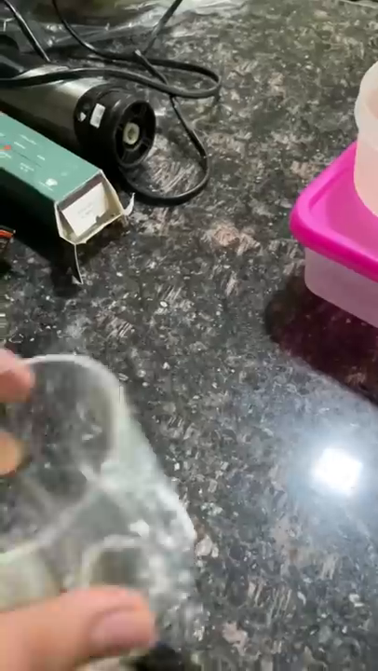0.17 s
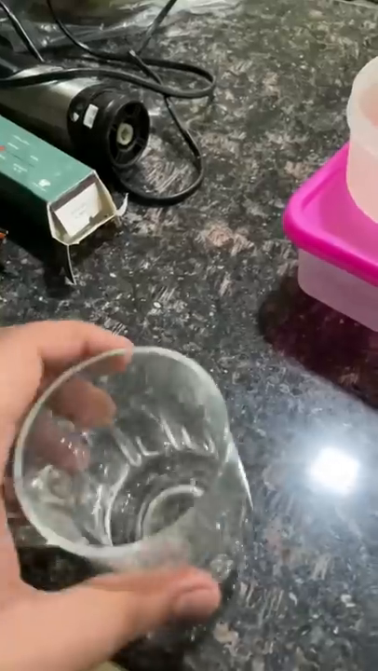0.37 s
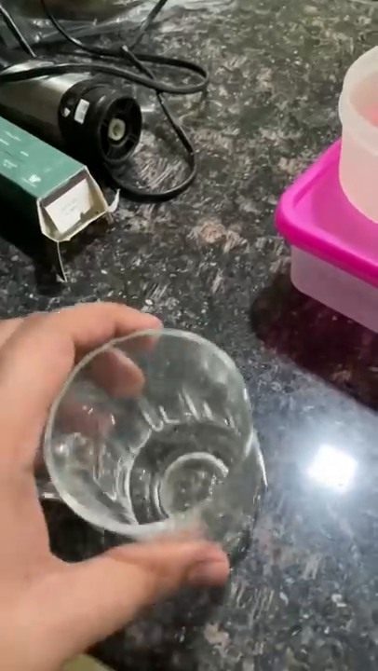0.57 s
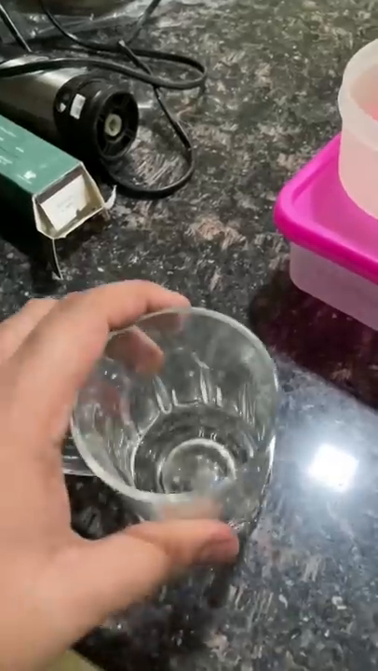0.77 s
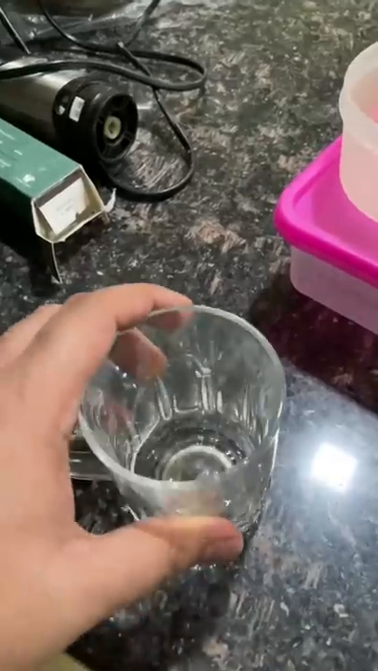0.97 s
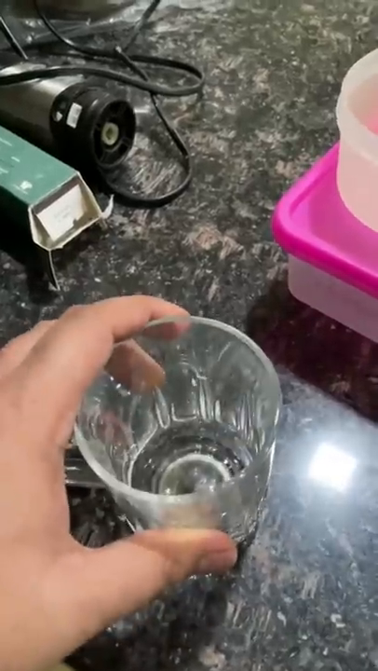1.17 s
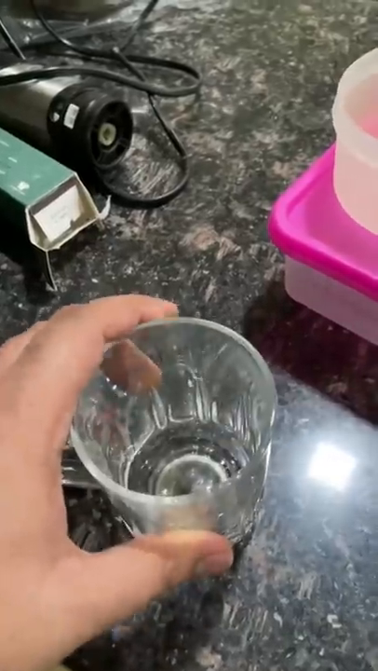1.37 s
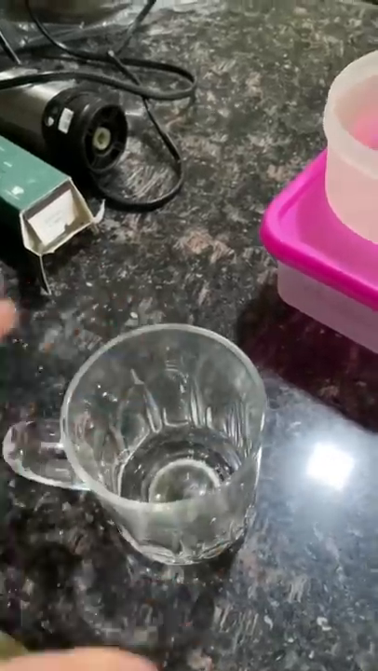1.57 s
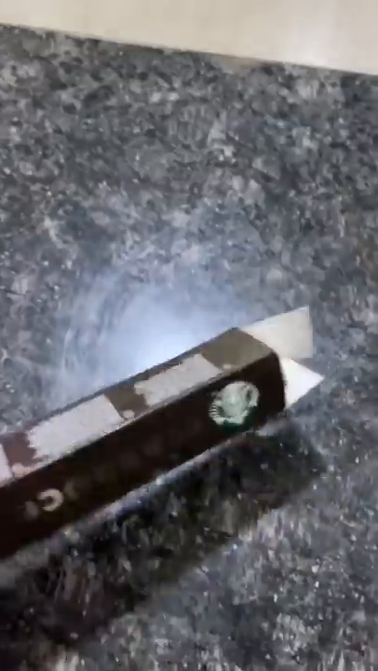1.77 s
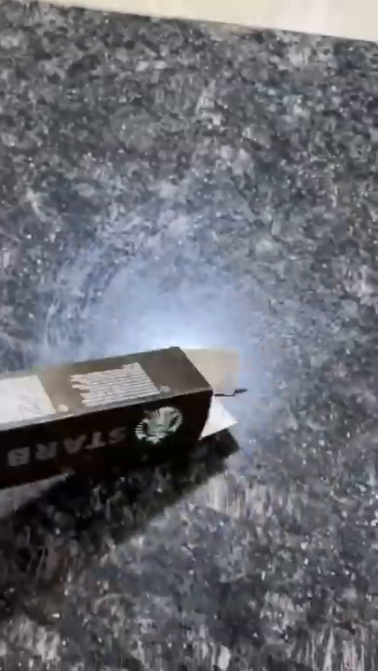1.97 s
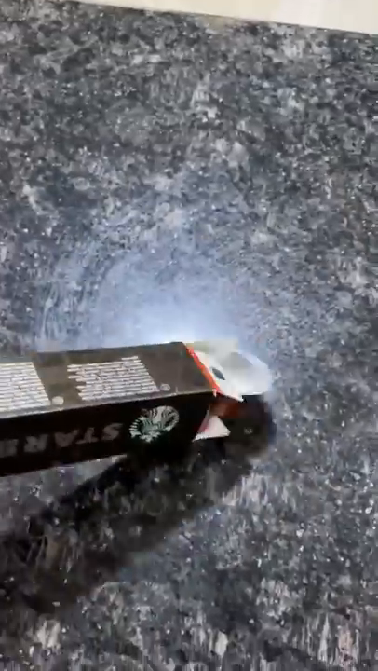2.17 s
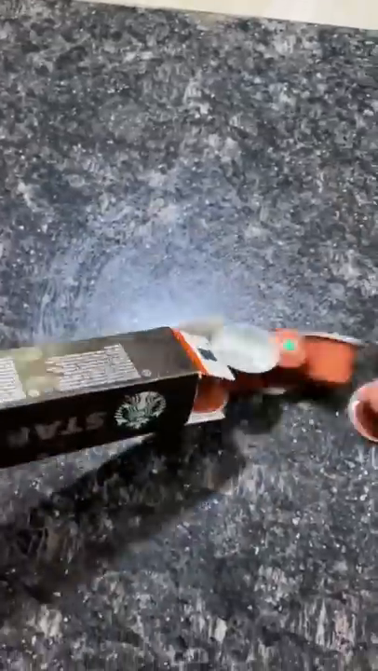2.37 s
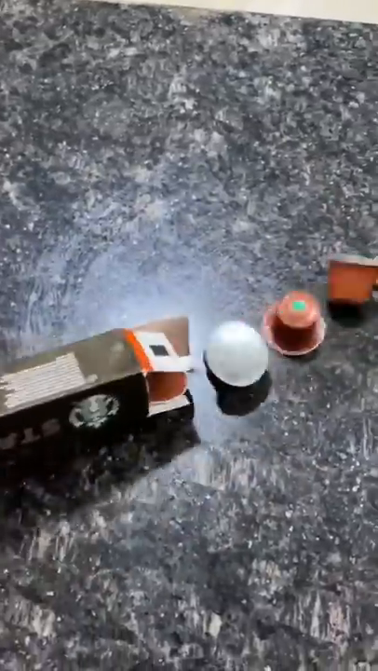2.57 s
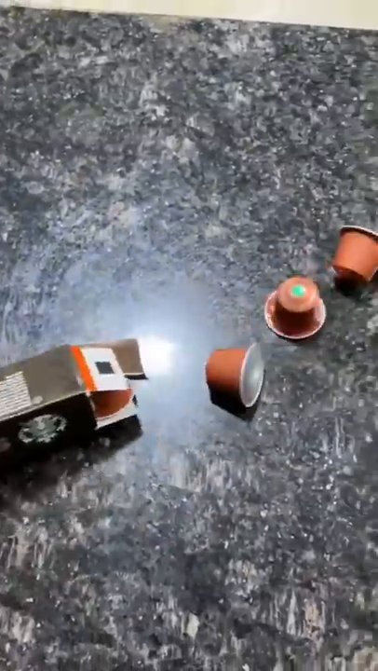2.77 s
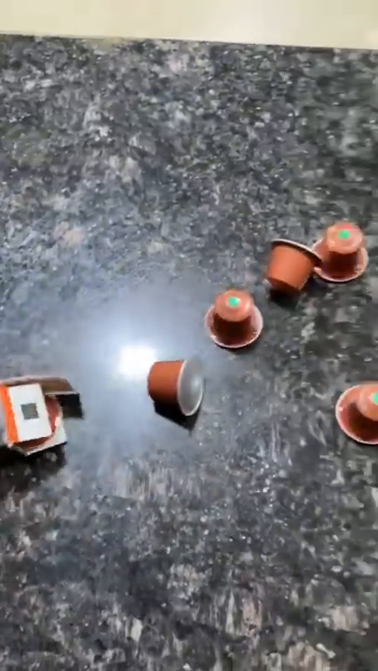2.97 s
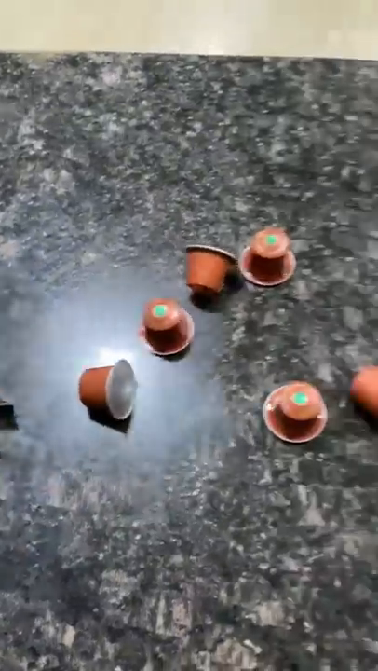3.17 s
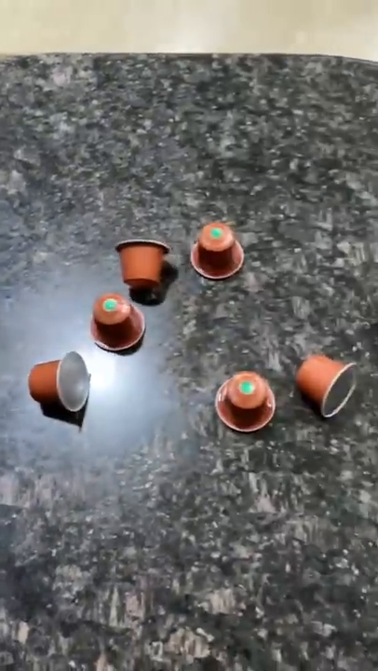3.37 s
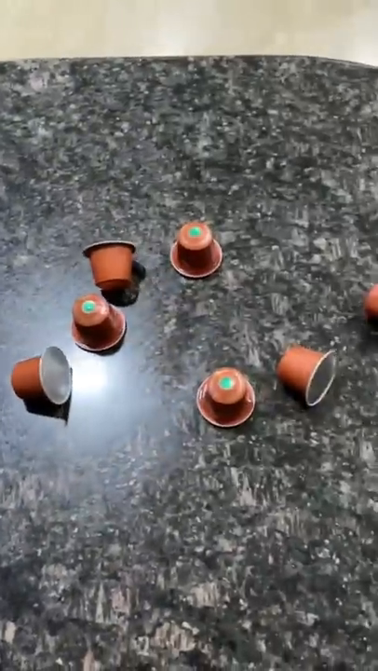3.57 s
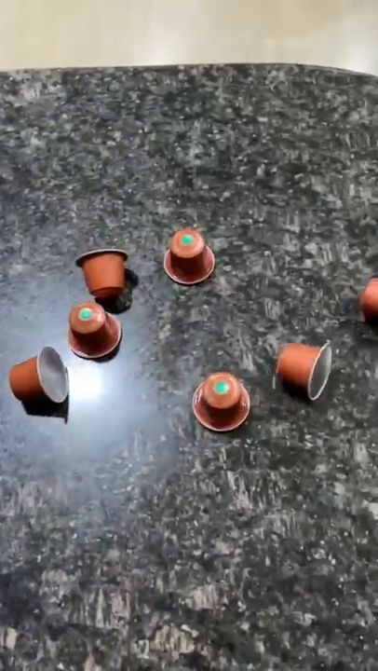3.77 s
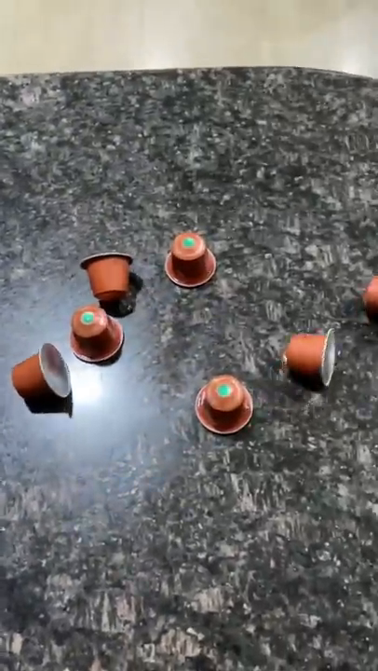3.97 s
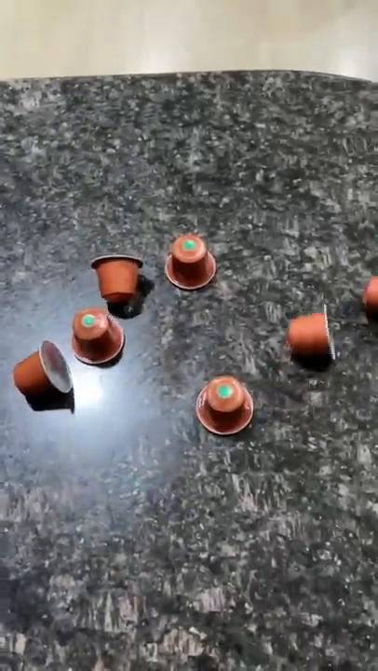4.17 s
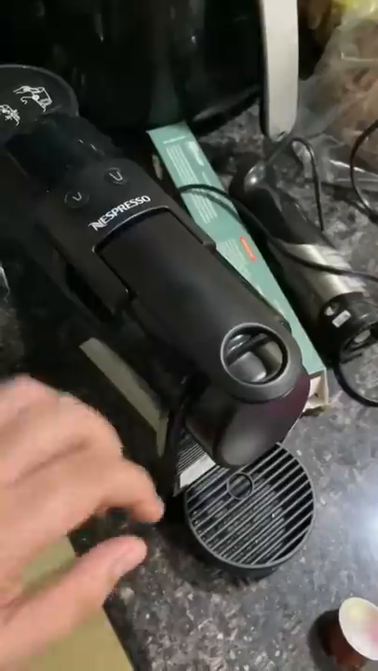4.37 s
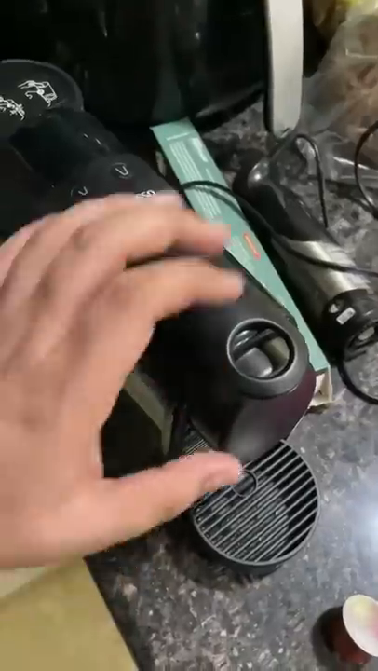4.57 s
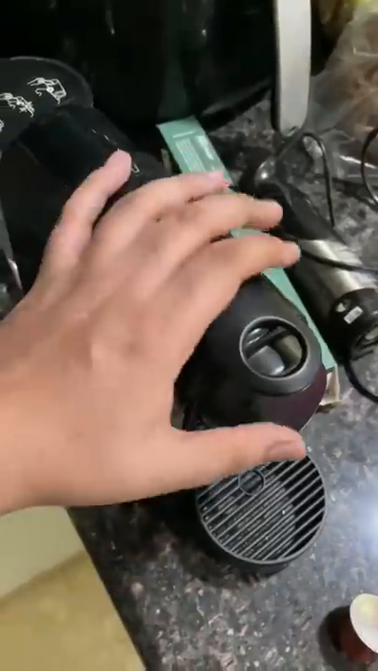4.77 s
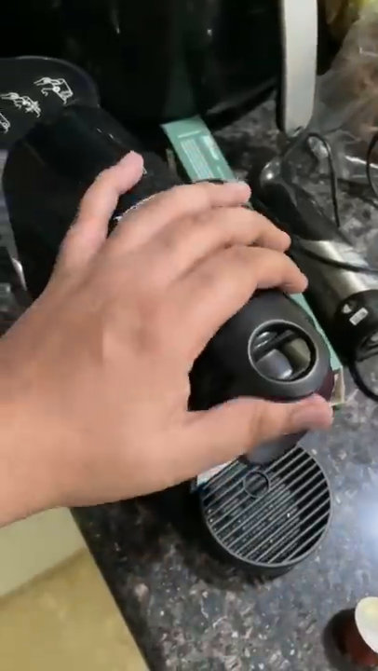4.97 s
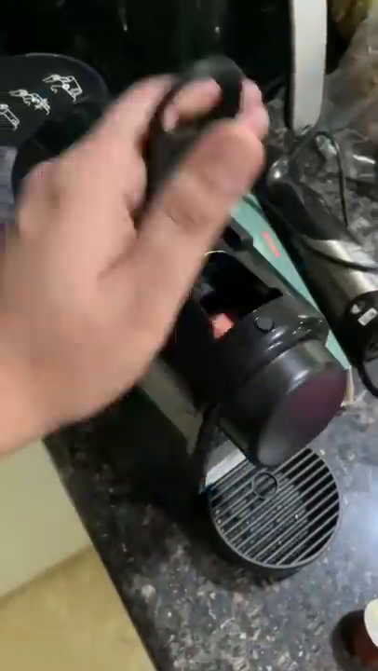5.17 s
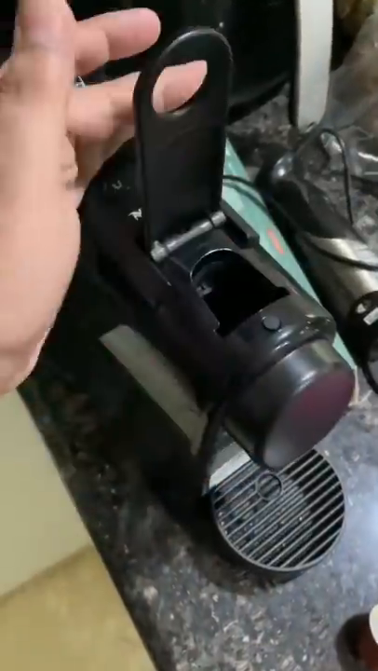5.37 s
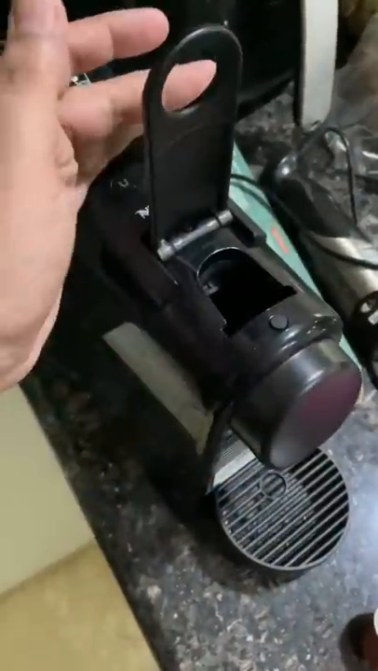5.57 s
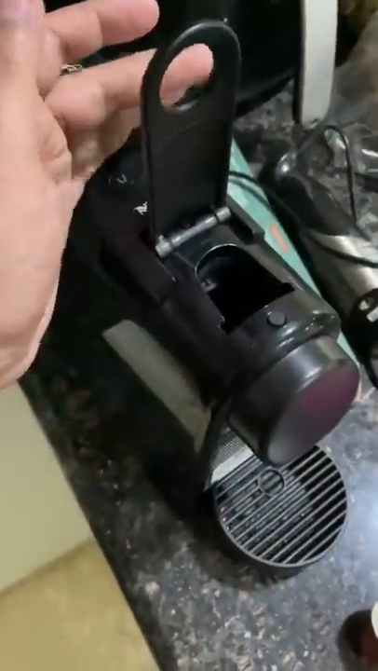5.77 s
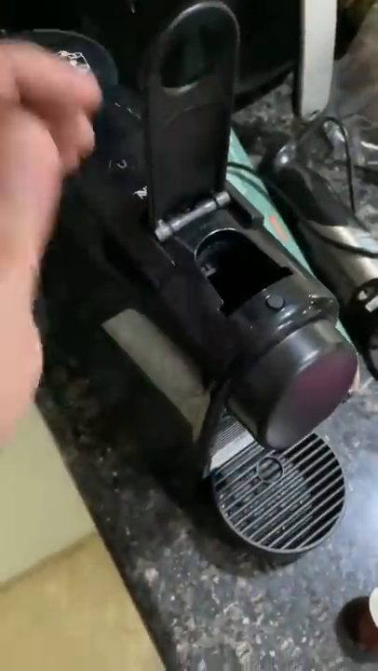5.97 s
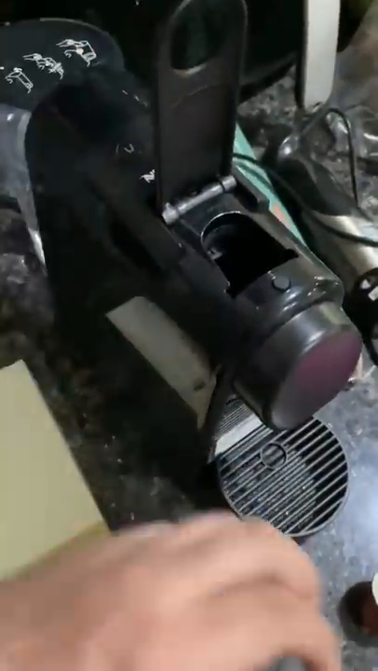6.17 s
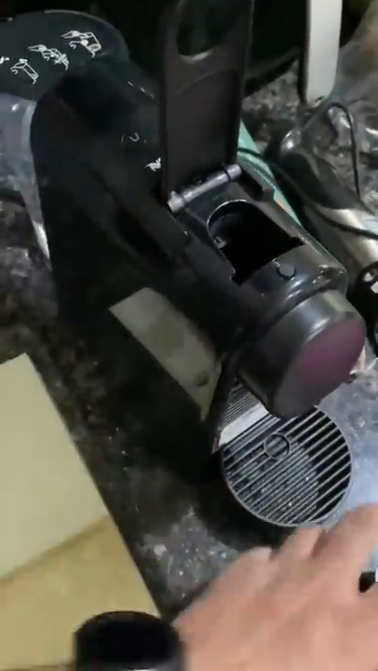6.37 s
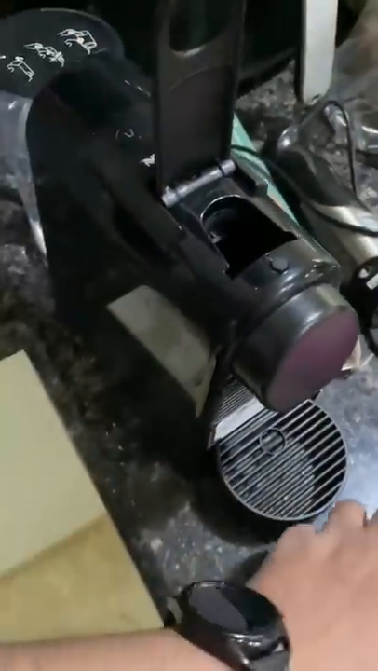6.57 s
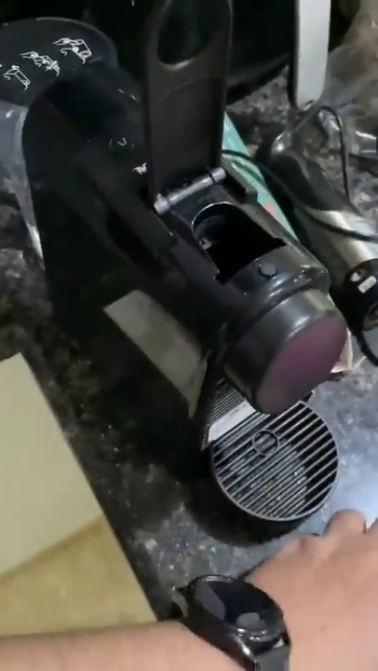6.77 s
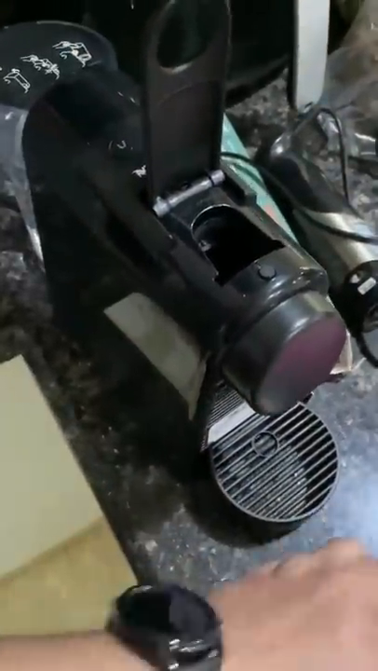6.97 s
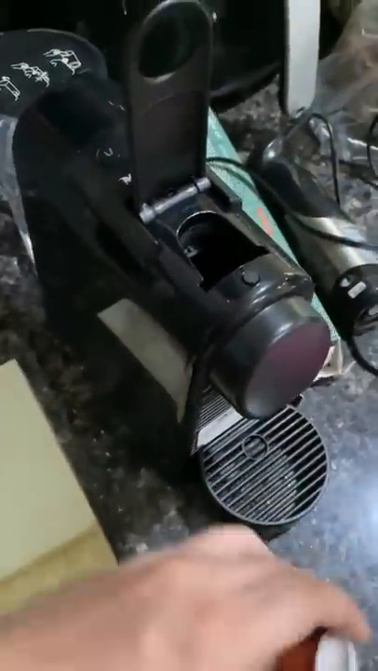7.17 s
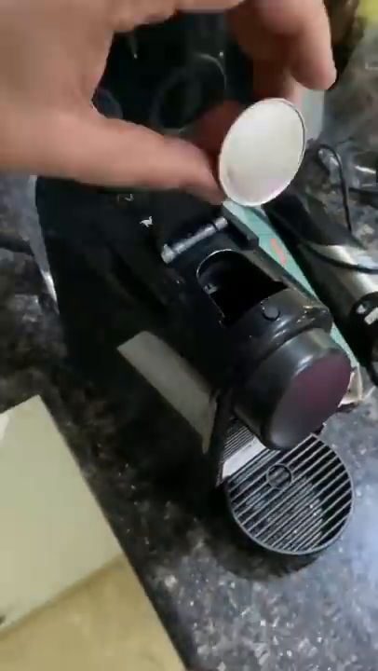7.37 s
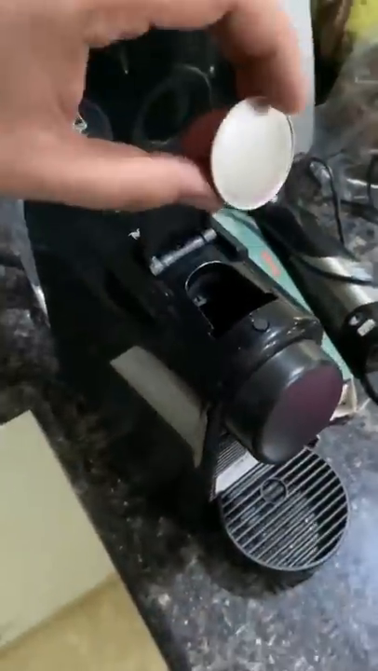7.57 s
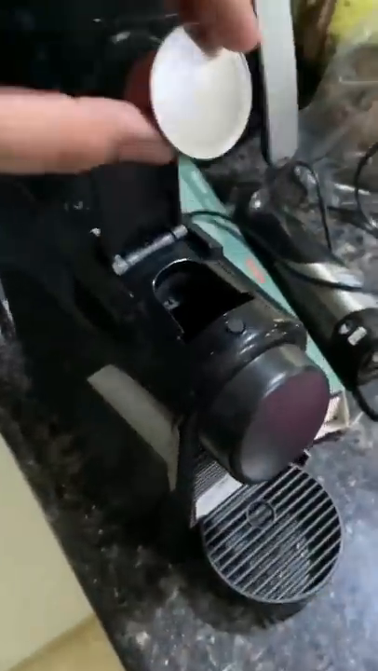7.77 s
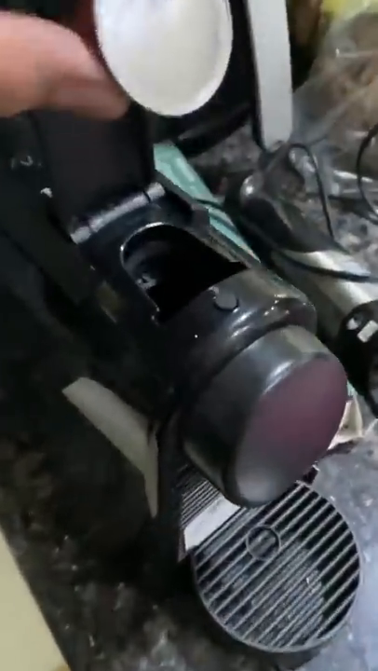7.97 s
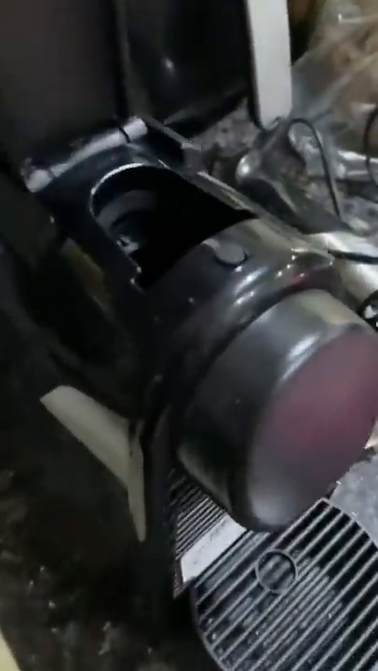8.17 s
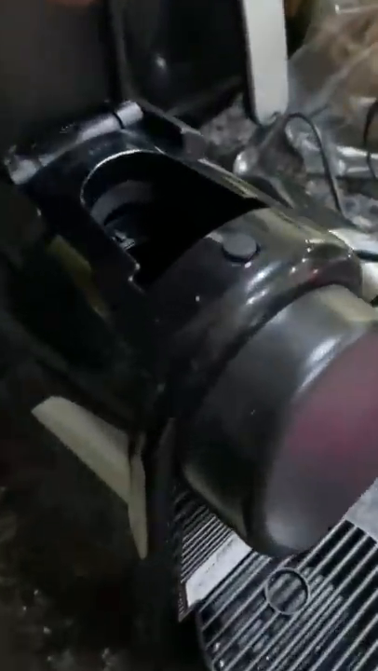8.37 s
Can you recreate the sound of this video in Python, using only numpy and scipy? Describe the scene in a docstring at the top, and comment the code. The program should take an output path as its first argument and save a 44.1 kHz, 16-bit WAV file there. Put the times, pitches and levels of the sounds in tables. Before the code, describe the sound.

A ringing glass set-down, a spill of small clacking coffee capsules and hollow plastic lever knocks, over faint kitchen hum.

```python
"""A kitchen with a stone counter. A thick glass mug is set down: it thuds, rings and grinds on the stone.
A cardboard sleeve taps the counter and spills small metal capsules that slide and clack. Then the plastic
lever of a coffee machine rubs and knocks on its hollow housing, and fingers pick up a capsule.
Room rumble, hiss and an appliance hum lie underneath. Two microphones hear it all from changing
positions, along with the echo off tiles and stone."""
import sys
import numpy as np
from scipy import signal
from scipy.fft import rfft, irfft, next_fast_len
from scipy.io import wavfile
from scipy.ndimage import uniform_filter1d

SR = 44100
rng = np.random.default_rng(int(sys.argv[2]) if len(sys.argv) > 2 else 0)


def master(y):
    """Save y as 16-bit WAV."""
    cut = np.clip(np.atleast_2d(y).T, -1, 1)
    pcm = np.round(cut * 32767)  # scale
    wavfile.write(sys.argv[1], SR, pcm.astype(np.int16))


N = 371322
TIME = np.arange(N) / SR
FFT_SIZE = next_fast_len(N)
FFT_HZ = np.fft.rfftfreq(FFT_SIZE, 1 / SR)
SIDES = np.array([[1], [-1]])   # plus for left, minus for right


def amp(db):
    """Turn decibels into a gain to multiply by."""
    return 10 ** (np.asarray(db) / 20)


def rms_one(x):
    """Scale a sound so that its average strength (rms) is 1."""
    return x / np.sqrt(np.mean(x ** 2) + 1e-20)


def filtered(x, kind, hz, order=2):
    """Keep the "low" side of hz, the "high" side, or the "band" between two pitches."""
    return signal.sosfilt(signal.butter(order, hz, kind, fs=SR, output="sos"), x)


def in_time(rows):
    """Join timed rows into one dB curve per column, silent before and after."""
    times, *columns = np.transpose(rows)
    return [np.interp(TIME, times, column, left=-200, right=-200) for column in columns]


def at_hz(points, hz):
    """Read a value between the rows of a table, on a musical (log) pitch scale."""
    pitches, values = np.transpose(points)
    return np.interp(np.log(hz + 1e-9), np.log(pitches), values)


def coloured(x, spectrum):
    """Give a sound the tone colour of a table, with nothing far beyond its ends; rms 1."""
    inside = (FFT_HZ > spectrum[0][0] / 2) & (FFT_HZ < spectrum[-1][0] * 1.2)
    gain = amp(at_hz(spectrum, FFT_HZ)) * inside
    return rms_one(irfft(rfft(x, FFT_SIZE) * gain, FFT_SIZE)[:N])


def drift(rate):
    """A smooth random wobble of size about 1; a higher rate wobbles faster."""
    steps_per_s = 60
    steps = rng.standard_normal(int(N / SR * steps_per_s) + 2)
    smooth = uniform_filter1d(steps, size=max(1, int(steps_per_s / 2 / rate)))
    return np.interp(TIME * steps_per_s, np.arange(len(steps)), rms_one(smooth))


def widened(shared, opposed, alike):
    """Mix two noises into left and right; alike runs from 0 (unrelated) to 1 (the same)."""
    return np.sqrt((1 + alike) / 2) * shared + np.sqrt((1 - alike) / 2) * opposed * SIDES


def grains(per_s, spread_db):
    """Random tiny contacts of uneven size."""
    sizes = amp(spread_db * np.minimum(rng.exponential(1, N), 4)) * rng.choice([-1, 1], N)
    return rms_one(sizes * (rng.random(N) < per_s / SR))


def ring(clicks, hz, ring_s):
    """Each click starts a tone. Its ring time, ring_s, is how long it takes to fade by 60 dB."""
    decay, step = amp(-60 / (ring_s * SR)), 2 * np.pi * hz / SR
    return signal.lfilter([0, np.sin(step)], [1, -2 * decay * np.cos(step), decay ** 2], clicks + 1e-18)


def scrape(contacts, tones, ring_scale=1):
    """A stream of tiny contacts keeps an object's natural tones ringing; rms 1."""
    return rms_one(sum(amp(db) * ring(contacts, hz, ring_s * ring_scale) for hz, db, ring_s in tones))


def strike(times, blows_db, tones, scatter_db, contact_s):
    """Each blow is a short noisy push that rings every natural tone with a partly random strength."""
    out, size = np.zeros(N), 1500
    first, last = round(min(times) * SR), min(round(max(times) * SR) + SR // 2, N)
    age = np.arange(1, size + 1) / (contact_s * SR)
    fade = np.sqrt(age) * np.exp(-age)   # the contact swells quickly, then dies
    for hz, level_db, ring_s in tones:
        force, luck = np.zeros(N + size), rng.standard_normal((len(times), size))
        wave = np.exp(-2j * np.pi * hz / SR * np.arange(size))
        for start, blow_db, noise in zip(times, blows_db, luck):
            at, gain = round(start * SR), amp(blow_db + level_db + scatter_db * noise[0])
            push = noise * fade / np.sqrt(np.sum(fade ** 2))
            felt = abs(push @ wave)   # how hard the push drives this tone
            force[at:at + size] += gain * push / max(felt, .5)
        out[first:last] += ring(force[first:last], hz, ring_s)
    return out


# How long the kitchen echoes. Each row: pitch in Hz, ring time in seconds.
ECHO_TIMES = [(100, 1), (400, 0.53), (1500, 0.57), (4000, 0.6), (6200, 0.48), (8000, 0.64), (15000, 0.2)]
# How alike the echo is left and right. Each row: pitch in Hz, likeness from 0 to 1.
ECHO_ALIKE = [(100, 1), (500, 0), (1500, 1), (5000, .1)]

def kitchen_echo():
    """Dense reflections off tiles and stone: noise that dies away at its own speed in each band."""
    t, out = np.arange(SR) / SR, 0
    edges_hz = 60 * 2 ** np.arange(0, 8.6, .5)
    for low, high in zip(edges_hz, np.minimum(edges_hz[1:], .45 * SR)):
        noises = filtered(rng.standard_normal((2, SR)), "band", [low, high])
        fade = amp(-60 * t / at_hz(ECHO_TIMES, np.sqrt(low * high)))
        out = out + widened(*noises, at_hz(ECHO_ALIKE, low)) * fade
    out = out * np.clip(t / 0.00084, 0, 1)   # a soft start
    return out / np.sqrt(np.sum(out ** 2, axis=1, keepdims=True))


# The tone colour of the rumble. Each row: pitch in Hz, relative level in dB.
RUMBLE_COLOUR = [(15, -38), (25, -5.5), (48, 2.5), (71, -12.5), (102, 2), (128, -10.5), (157, -3),
                 (257, -5), (289, -10), (314, -10.5), (376, -5.5), (444, -15), (490, -5.5), (729, -22.5),
                 (1300, -34.5), (1690, -44), (2860, -120)]

def room_rumble(alike):
    """Distant, wavering low noise that grows duller near the end."""
    shared, opposed = (coloured(rng.standard_normal(N), RUMBLE_COLOUR)
                       * amp(1.5 * drift(8) + 0.31 * drift(1.5)) for _ in range(2))
    rumble = widened(shared, opposed, alike)
    dull = signal.sosfiltfilt(signal.butter(2, 128, fs=SR, output="sos"), rumble)
    dull_share = np.interp(TIME, [6.7, 8.4], [0, 0.4])
    return (1 - dull_share) * rumble + dull_share * dull


# The tone colour of the hiss. Each row: pitch in Hz, relative level in dB.
HISS_COLOUR = [(900, -24.5), (1500, -7.5), (2200, -1), (2800, -3.5), (5500, -5.5), (7000, -16),
               (9600, -15.5), (11000, -21), (15500, -29.5)]

def room_hiss():
    """Faint hiss with a blurred appliance whine, made of a narrow band of noise."""
    whine_hz, width_hz = 2150, 150
    whine = rms_one(ring(rng.standard_normal((2, N)), whine_hz, np.log(1000) / (np.pi * width_hz)))
    hiss = np.array([coloured(rng.standard_normal(N), HISS_COLOUR) for _ in range(2)])
    return amp(-83.5 + 1.2 * drift(4.1)) * hiss + amp(-87) * whine


# Faint appliance tones that never stop. Each row: pitch in Hz, level in dB.
WHINES = [(259, -65), (12600, -110)]

def appliance_tones():
    """An appliance hums for a few seconds over two fainter tones; all waver in level."""
    hum_hz, hum_db = 160, -52.5
    humming = (TIME > 1.71) & (TIME < 4.226)
    tones = amp(hum_db + 0.73 * drift(4.2)) * np.sin(2 * np.pi * hum_hz * TIME) * humming
    for hz, db in WHINES:
        tones += amp(db + 2.7 * drift(8.9)) * np.sin(2 * np.pi * hz * TIME)
    return np.sqrt(2) * tones


def deep_swell():
    """A deep rumble swells near the end."""
    deep = rms_one(filtered(rng.standard_normal(N), "low", hz=153, order=4))
    return deep * amp(-54.5) * np.interp(TIME, [7.8, 8.15], [0, 1])


# The room from three listening spots. Each row: start in seconds, rumble level in dB,
# left-right likeness of the rumble from 0 to 1, how much louder the left side is in dB.
SPOTS = [(0, -54, 0.82, 2.5), (1.698, -52.5, 0.99, 2.5), (4.225, -52.5, 0.48, 0.5)]
# Brief dips in the background. Each row: middle in seconds, width in seconds,
# change of the rumble and tones in dB, change of the hiss in dB.
DIPS = [(0.015, 0.03, -78, -48.5), (4.226, 0.025, -10, -8), (6.189, 0.036, -16, -4),
        (7.592, 0.049, -13, -7)]

def room_tone():
    """Rumble, hiss and appliance tones at each listening spot; the level dips briefly four times."""
    spots = np.array(SPOTS)
    spot_now = np.maximum(np.searchsorted(spots[:, 0], TIME) - 1, 0)
    _, rumble_db, alike, left_db = spots[spot_now].T
    rumble, hiss = amp(rumble_db) * room_rumble(alike), room_hiss()
    drone = rumble + appliance_tones() + deep_swell()
    drone_dip_db, hiss_dip_db = sum(np.outer(depths_db, np.exp(-(2 * (TIME - middle) / width) ** 4))
                                    for middle, width, *depths_db in DIPS)
    return (drone * amp(drone_dip_db) + hiss * amp(hiss_dip_db)) * amp(left_db / 2 * SIDES)


# The sleeve tapping the counter. Each row: start in seconds, level in dB.
SLEEVE_TAPS = [(1.838, -32.5), (2.242, -29), (2.65, -29.5), (2.939, -23.5)]
# The cardboard's natural tones. Each row: pitch in Hz, level in dB, ring time in seconds.
SLEEVE_TONES = [(334.1, -3, 0.047), (560, -12, 0.024), (868, -6.5, 0.023), (1310, -11, 0.021),
                (1650, -14.5, 0.04)]

def sleeve():
    """Hollow cardboard gives dull, quick knocks."""
    times, blow_db = np.transpose(SLEEVE_TAPS)
    return strike(times, blow_db, SLEEVE_TONES, scatter_db=1.6, contact_s=0.0026)


# The mug being pushed into place. Each row: time in seconds, level in dB.
GRIND_LEVELS = [(.55, -60), (.62, -73.5), (.72, -69.5), (.78, -78), (.88, -67), (.94, -87), (1.25, -100),
                (1.3, -78), (1.35, -83.5), (1.37, -82), (1.42, -71), (1.46, -100)]
# Glass tones that grit sets ringing. Each row: pitch in Hz, level in dB, ring time in seconds.
GRIND_TONES = [(2780, -7, .06), (6280, -16, .04), (8050, -1, .03), (14920, -2, .025), (15600, -8, .02)]

def mug_grind():
    """The mug's base grinds over grit on the stone, and the glass rings faintly."""
    grit = grains(per_s=1200, spread_db=-0.5)
    (level_db,) = in_time(GRIND_LEVELS)
    return amp(level_db + 3.24 * drift(15)) * scrape(grit, GRIND_TONES)


def glass_clink(times, blows_db, tones, scatter_db):
    """Clean, instant blows ring the glass; neighbouring tones start in opposite directions."""
    out = np.zeros(N)
    for k, (hz, level_db, ring_s) in enumerate(tones):
        luck_db = scatter_db * rng.standard_normal(len(times))
        clicks = np.zeros(N)
        clicks[np.round(times * SR).astype(int)] = amp(blows_db + level_db + luck_db)
        out += (-1) ** k * ring(clicks, hz, ring_s)
    return out


# The mug landing and settling. Each row: start in seconds, then levels in dB
# of the deep thud, the higher knock, the glass walls, the base and the crunch.
MUG_HITS = [(0.546, -23, -16, -10, -36.5, -26), (0.562, -17, -19, -12, -35.5, -38.5),
            (0.575, -17.5, -44, -31.5, -45.5, -34), (0.898, -57, -26.5, -24, -43.5, -47),
            (0.905, -51, -34, -41, -41, -38.5), (0.911, -43, -22.5, -13, -22, -27.5),
            (0.923, -32.5, -29.5, -51, -41, -52), (1.048, -61, -44.5, -36, -40.5, -56),
            (1.368, -72, -62, -48, -63, -78.5), (1.397, -61.5, -57, -62, -60, -80),
            (1.412, -62.5, -52.5, -63, -59.5, -86), (1.423, -65, -74, -63, -61.5, -85),
            (1.587, -65, -58, -70.5, -66.5, -79)]
# Four sets of natural tones. Each row: pitch in Hz, level in dB, ring time in seconds.
SLAB_TONES = [(136, -13.5, 0.2352), (256, -16, 0.23), (330, -18, 0.092), (380, -13, 0.083), (466, -18, 0.1),
              (661, -17.5, 0.035), (806, -6, 0.019), (920, 8, 0.02), (1074, -3.5, 0.016), (1420, -7, 0.03),
              (1728, -11.5, 0.039), (2050, -11.5, 0.047)]   # mug and counter slab together
WALL_TONES = [(2752, -17, 0.15), (3027, -32, .07), (3730, -22.5, 0.034), (4985, -41.5, 0.042),
              (6330, -30.5, 0.06), (8070, -25, 0.067), (13190, -21, .02), (14990, -13, 0.0583)]   # the glass walls
BASE_TONES = [(965, -2, 0.11), (1144, -5.5, 0.093), (1320, -3, 0.23), (2570, -10.5, .15), (3800, -20, .15)]   # the thick base
CRUNCH_TONES = [(1800, 10.5, 0.0031), (2500, 8, 0.004), (3160, 12.5, 0.0017), (4100, -18.5, 0.0066),
                (6160, -19.5, 0.0011)]   # glass against stone

def mug():
    """The thick base thuds on the slab with a short crunch, and the walls ring thinly."""
    times, thud_db, knock_db, wall_db, base_db, crunch_db = np.transpose(MUG_HITS)
    deep_tones = [tone for tone in SLAB_TONES if tone[0] < 700]
    higher_tones = [tone for tone in SLAB_TONES if tone not in deep_tones]
    hits = strike(times, thud_db, deep_tones, scatter_db=1.0, contact_s=0.0024)
    hits += glass_clink(times, base_db, BASE_TONES, scatter_db=1.7)
    hits += strike(times, knock_db, higher_tones, scatter_db=3.7, contact_s=0.0014)
    hits += glass_clink(times, wall_db, WALL_TONES, scatter_db=1.5)
    hits += strike(times, crunch_db, CRUNCH_TONES, scatter_db=1.3, contact_s=0.0051)
    hits = filtered(hits, "low", hz=4220)   # the heavy base lands too slowly to make much treble
    return filtered(hits + mug_grind(), "high", hz=88)   # the mug's sounds carry no deep bass


# The lever's joints knocking. Each row: start in seconds, then levels in dB
# of the hollow blow, the lever arm, the housing's higher snap and the latch.
LEVER_KNOCKS = [(4.894, -31.5, -45, -46, -57), (4.981, -63, -57.5, -35, -40.5),
                (5.035, -25, -33, -36, -31.5), (5.06, -18, -11.5, -29, -38), (5.066, -18.5, -15, -23, -29),
                (5.076, -14.5, -13.5, -35, -24.5), (5.083, -12, -26, -16, -21), (5.088, -8, -15, -19, -28),
                (5.119, -19, -44, -22, -43), (5.133, -21, -48, -43, -47), (5.172, -29.5, -44, -27, -27),
                (5.185, -24, -20, -21, -28), (5.201, -11.5, -16.5, -22, -16.5),
                (5.207, -7.5, -11, -11, -24), (5.233, -19, -35, -26, -37), (5.24, -16.5, -26, -22, -29),
                (5.252, -18, -41, -42, -42), (5.268, -14, -30, -17, -25.5), (5.286, -3, -42, -13, -31.5),
                (5.308, -16.5, -50, -41, -57), (5.337, -15, -31, -39, -40),
                (5.363, -11.5, -43.5, -15.5, -32.5), (5.373, -22.5, -32, -29, -27.5),
                (5.381, -15, -44, -8.5, -33.5), (5.411, -12, -32, -18.5, -31), (5.42, -18, -39, -24, -50)]
# Fingers brush the lever, then it rubs in its guides.
# Each row: time in seconds, housing level in dB, latch level in dB.
LEVER_RUB = [(4.55, -90, -77), (4.72, -60, -68), (4.8, -69, -69.5), (4.95, -77.5, -76.5),
             (5.02, -51.5, -78), (5.07, -28, -40), (5.15, -42.5, -78), (5.26, -26, -62), (5.325, -77, -62),
             (5.4, -47, -46), (5.5, -59, -102)]
# Three sets of natural tones. Each row: pitch in Hz, level in dB, ring time in seconds.
HOUSING_TONES = [(400, -25, 0.038), (483.5, -28, 0.03), (534, -9, 0.031), (620.4, -7, 0.0386),
                 (687, -19, 0.058), (810, -17, 0.042), (982, -13, 0.025), (1197, -9.5, 0.026),
                 (1957, -15.5, 0.015), (2566, -14, 0.0043)]   # the hollow housing
ARM_TONES = [(1430, -3.5, 0.0096), (1480, -3.5, 0.01)]   # the lever arm
LATCH_TONES = [(3430, 5.5, 0.0035), (4385, -11, 0.0024), (5670, 0.5, 0.0041), (7370, -6, 0.0016),
               (8690, 2, 0.0038), (10000, 2.5, 0.0021), (12150, -7.5, 0.003), (14900, -11, 0.004)]   # the bright latch

def lever():
    """Joints slip and knock on the hollow housing; between knocks, plastic rubs on plastic."""
    low_rub_db, high_rub_db = in_time(LEVER_RUB)
    friction = grains(per_s=2400, spread_db=-5.0)
    rub = amp(low_rub_db) * scrape(friction, HOUSING_TONES)
    rub += amp(high_rub_db) * scrape(friction, LATCH_TONES, ring_scale=0.5)
    times, hollow_db, arm_db, snap_db, latch_db = np.transpose(LEVER_KNOCKS)
    hollow_tones = [tone for tone in HOUSING_TONES if tone[0] < 1050]
    snap_tones = [tone for tone in HOUSING_TONES if tone not in hollow_tones]
    blow_s, slip_s = 0.0013, 0.004
    knocks = strike(times, hollow_db, hollow_tones, scatter_db=1.14, contact_s=blow_s)
    knocks += strike(times, arm_db, ARM_TONES, scatter_db=0.89, contact_s=blow_s)
    knocks += strike(times, snap_db, snap_tones, scatter_db=2.5, contact_s=slip_s)
    knocks += strike(times, latch_db, LATCH_TONES, scatter_db=1.6, contact_s=slip_s)
    return filtered(knocks + rub, "high", hz=300)   # the knocks and rubbing carry no bass


# Capsules slide out of the sleeve; later one is picked up and turned in the fingers. One list per move.
# Each row: time in seconds, level in dB, extra treble in dB.
RATTLE_MOVES = [
    [(1.7, -56.5, -2.5), (1.8, -56.5, -2), (1.89, -55, -12.5), (1.98, -47, 3), (2.22, -34.5, 6.5),
     (2.34, -37, 9), (2.52, -40.5, 11.5), (2.65, -54.5, 19.5), (2.78, -60.5, 12.5), (2.9, -63.5, 7.5),
     (3.0, -58, 3), (3.12, -56, 6), (3.2, -87.5, -3)],
    [(6.33, -94, 6.5), (6.36, -73.5, 5), (6.6, -70, 10), (6.69, -72, 3.5), (6.695, -52.5, 12),
     (6.76, -78, 25)],
    [(7.22, -105, 22.5), (7.25, -95, 21), (7.33, -96.5, 17), (7.35, -105, -4)],
    [(7.66, -110, 13.5), (7.72, -90.5, 12.5), (7.87, -88, 22.5), (7.95, -96, 31), (8.03, -110, 5.5)],
]
# The tone colour of the rattle. Each row: pitch in Hz, relative level in dB.
RATTLE_COLOUR = [(250, -4), (500, 4), (1000, -0.5), (1700, 3.5), (2400, -5), (3500, -7.5), (4300, -6),
                 (4900, -14), (5650, -7.5), (7500, -17), (8600, -8), (11300, -17), (12300, -19.5),
                 (15500, -26.5)]

def capsule_rattle():
    """Sliding capsules make a stream of tiny contacts and now and then bump into each other."""
    rattle = coloured(grains(per_s=2500, spread_db=-2.0), RATTLE_COLOUR)
    treble = filtered(rattle, "high", hz=4500)
    bumps_per_s, bump_db, decay_cycles = 24, 12, 2.2
    clicks = (rng.random(N) < bumps_per_s / SR) * amp(bump_db + rng.standard_normal(N))
    pitch_choice = rng.integers(0, 6, N)
    bumps = sum(ring(clicks * (pitch_choice == k), hz, np.log(1000) * decay_cycles / hz)
                for k, hz in enumerate(np.geomspace(950, 2400, 6)))
    out = np.zeros(N)
    for move in RATTLE_MOVES:
        level_db, treble_db = in_time(move)
        out += amp(level_db + 3 * drift(25)) * (rattle - treble + amp(treble_db) * treble + bumps)
    return out


# Capsules clacking on the stone, then one clicking in the fingers; last, a faint tick as the
# background dips. Each row: start in seconds, pitch of the body's click in Hz,
# then levels in dB of that click, the shell's ring and the crack.
CLACKS = [(1.712, 1370, -26.5, -48.5, -65), (1.839, 1310, -27.5, -44, -56), (2.033, 1610, -26, -41, -57),
          (2.067, 1690, -11, -36, -41), (2.155, 1020, -30.5, -24.5, -31), (2.187, 1640, -31, -21.5, -23.5),
          (2.2, 2230, -20, -42, -41), (2.218, 2650, 0.5, -35, -37), (2.243, 1470, -19.5, -23, -23.5),
          (2.278, 2860, -19, -20, -38), (2.287, 3180, -9, -13, -26), (2.315, 2820, 0, -24, -34),
          (2.354, 3900, -1.5, -9.5, -15.5), (2.366, 2370, -37, -35, -21), (2.4188, 2500, 0, -31, -26),
          (2.459, 1480, -31, -37, -23), (2.491, 3170, -20, -27.5, -28), (2.5, 1800, -23, -44, -38),
          (2.527, 2330, -1, -22.5, -14.5), (2.609, 5230, -11, -7.5, -25), (2.645, 1200, -25.5, -38, -28.5),
          (2.681, 5400, -3, -15.5, -30.5), (2.745, 4230, -54, -45, -33.5), (2.762, 4060, -50, -48, -38),
          (2.796, 3010, -62, -52.5, -38.5), (2.875, 887, -38.5, -53, -40.5), (2.939, 2177, -46, -56, -43),
          (2.95, 1800, -46, -53.5, -44.5), (2.956, 1800, -54, -57.5, -45.5), (3.023, 2397, -48, -61, -48.5),
          (3.052, 1310, -46, -53, -57), (3.113, 903, -40, -54.5, -53.5), (3.157, 1280, -45, -70.5, -71),
          (3.204, 5010, -67, -66, -69.5), (3.498, 4960, -70.5, -71, -75), (3.568, 966, -47.5, -70, -61),
          (3.679, 6323, -66, -73.5, -71), (3.793, 6520, -61.5, -76, -75.5), (3.844, 2014, -76.5, -82, -68),
          (4.089, 1087, -46.5, -73.5, -73.5), (4.194, 6770, -68, -81, -79), (6.365, 1817, -47, -51.5, -51),
          (6.448, 1500, -51.5, -63, -63.5), (6.694, 2900, -42, -56, -64.5),
          (6.703, 3703, -42.5, -35.5, -57), (6.745, 3670, -32, -40.5, -38),
          (6.7529, 3740, -17, -12.5, -28.5), (7.345, 1810, -65, -72, -62), (7.593, 1703, -65, -87, -87)]
# The thin metal shell's natural tones. Each row: pitch in Hz, level in dB, ring time in seconds.
SHELL_TONES = [(3740, -10, 0.011), (4230, -12.5, 0.0043), (5630, -9.5, .005), (5780, 0, 0.008),
               (6480, -10, 0.0045), (7200, -21.5, 0.0022)]
# Harder clacks are shorter. Each row: click level in dB, cycles it takes to fade to about a third.
CLICK_CYCLES = [(-16, 2.8), (-7, 1.3)]

def capsule_clacks():
    """A clack is a short click of the body, the ring of the thin shell and a bright crack."""
    times, click_hz, click_db, shell_db, crack_db = np.transpose(CLACKS)
    out = strike(times, shell_db, SHELL_TONES, scatter_db=1.6, contact_s=0.0012)
    t, crack_decay_s = np.arange(400) / SR, 0.0022
    hiss = filtered(rng.standard_normal((len(times), len(t))), "high", hz=7500)
    cycles = np.interp(click_db, *np.transpose(CLICK_CYCLES))
    for k, at in enumerate(np.round(times * SR).astype(int)):
        click = np.sin(2 * np.pi * click_hz[k] * t) * np.exp(-t * click_hz[k] / cycles[k])
        crack = hiss[k] * np.exp(-t / crack_decay_s)
        out[at:at + len(t)] += amp(click_db[k]) * click + amp(crack_db[k]) * crack
    return filtered(filtered(out, "high", hz=1100), "high", hz=1100)   # the clacks carry no bass


def placed(x, echo, shade, echo_db, left_late_ms):
    """Direct sound reaches the two microphones at different times and levels; the echo follows."""
    delay = np.exp(-1j * np.pi * FFT_HZ * left_late_ms / 1000 * SIDES)
    balance = amp(at_hz(shade, FFT_HZ) / 2 * SIDES)
    direct = irfft(rfft(x, FFT_SIZE) * delay * balance, FFT_SIZE)[:, :N]
    return direct + amp(echo_db) * signal.fftconvolve(x[None], echo, axes=1)[:, :N]


# The body that holds the microphones shades one of them, for sounds on the counter or at the machine.
# Each row: pitch in Hz, how much louder the left side is in dB.
SHADE_COUNTER = [(250, 0), (600, 11), (1200, 6), (2400, 4.5), (4200, 5.5)]
SHADE_MACHINE = [(250, -1.5), (600, 0.5), (1200, -6.5), (2400, -5.5), (4200, -5)]

def scene():
    """The mug and the spill are louder on the left, the lever and the held capsule on the right."""
    echo = kitchen_echo()
    capsules = capsule_clacks() + capsule_rattle()
    after_spill = TIME > 4.226
    spill = capsules * ~after_spill + sleeve()
    held = filtered(capsules * after_spill, "high", hz=1200)   # in the fingers, no counter to boom on
    return (room_tone()
            + placed(mug(), echo, SHADE_COUNTER, echo_db=-7.5, left_late_ms=0.36)
            + placed(spill, echo, SHADE_COUNTER, echo_db=-12.0, left_late_ms=-0.0074)
            + placed(lever(), echo, SHADE_MACHINE, echo_db=-14.0, left_late_ms=0.461)
            + placed(held, echo, SHADE_MACHINE, echo_db=-11.5, left_late_ms=-0.03))


# How far the left channel's wave runs ahead in the treble. Each row: pitch in Hz, lead in radians.
LEFT_LEAD = [(5600, 0.8), (7500, 1.2), (8500, 2.9), (11600, 3.3), (12200, 5.2), (16500, 5.4)]

def record(dry):
    """Cut the deepest bass and the very top; in the treble both sides carry mostly the left microphone."""
    spectrum = rfft(filtered(dry, "high", hz=45, order=6), FFT_SIZE)
    treble = np.interp(FFT_HZ, [3100, 4100], [0, 1])
    left_share = 0.92 * treble
    spectrum = (1 - left_share) * spectrum + left_share * spectrum[0]
    phase_turn = np.exp(.5j * treble * at_hz(LEFT_LEAD, FFT_HZ) * SIDES)
    top_cut = signal.cheby2(20, 100, 16900, fs=SR, output="sos")
    return signal.sosfilt(top_cut, irfft(spectrum * phase_turn, FFT_SIZE)[:, :N])


dry = scene()
out = record(dry)
master(out)
```